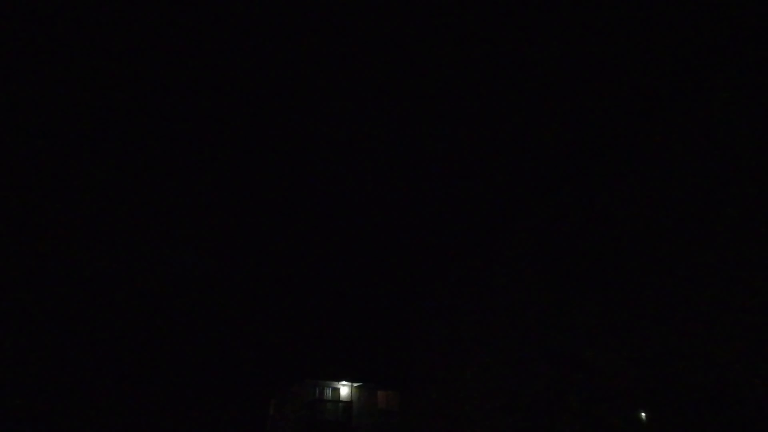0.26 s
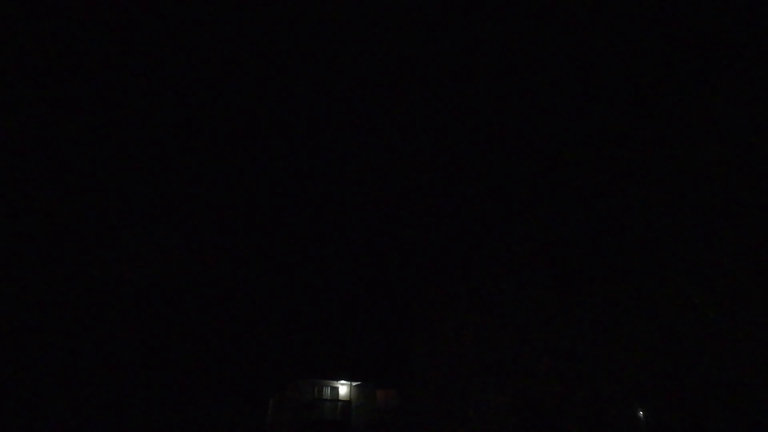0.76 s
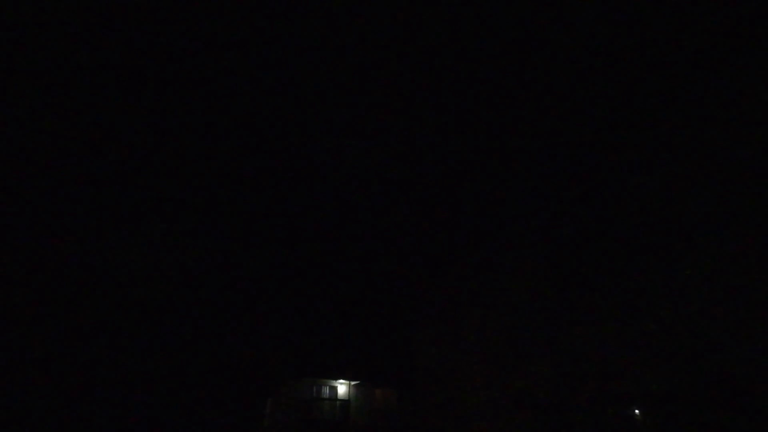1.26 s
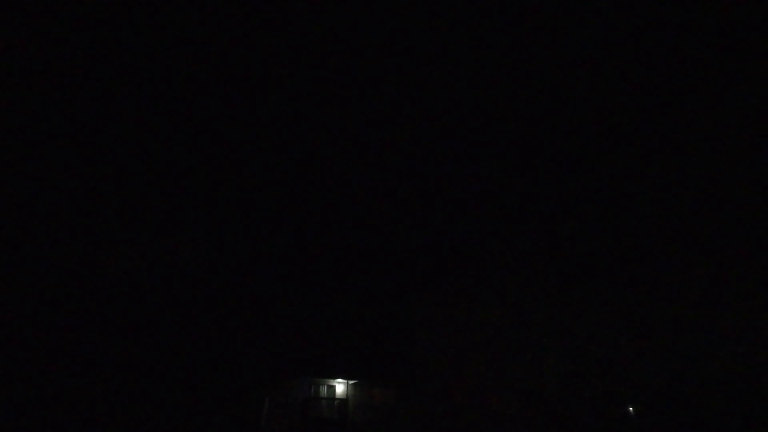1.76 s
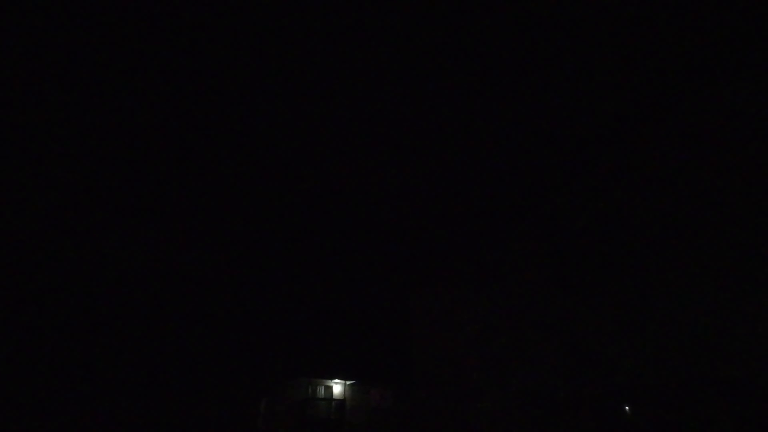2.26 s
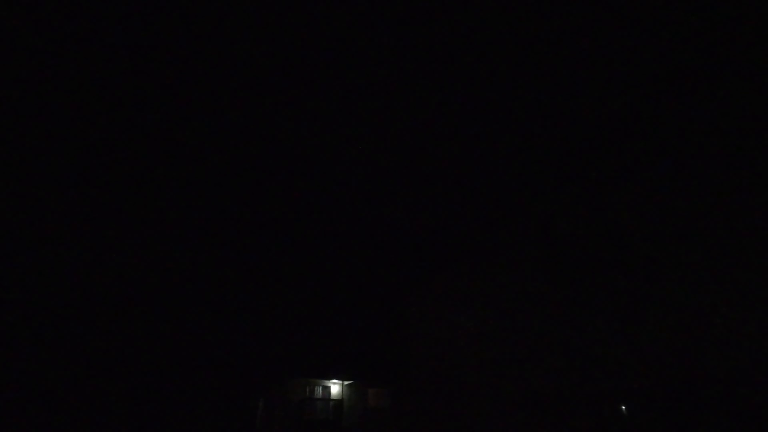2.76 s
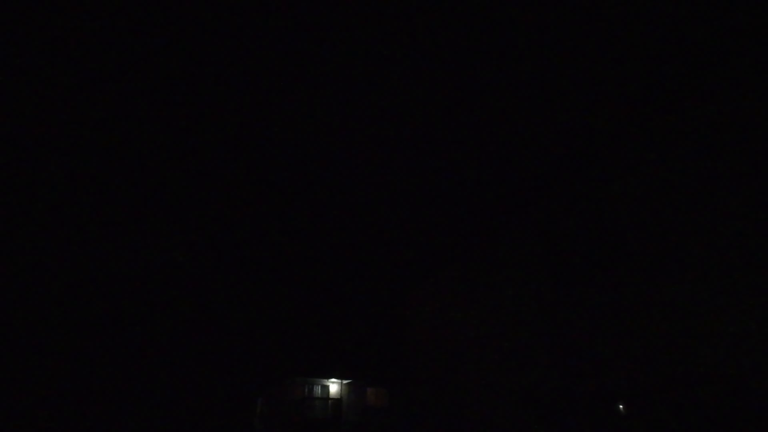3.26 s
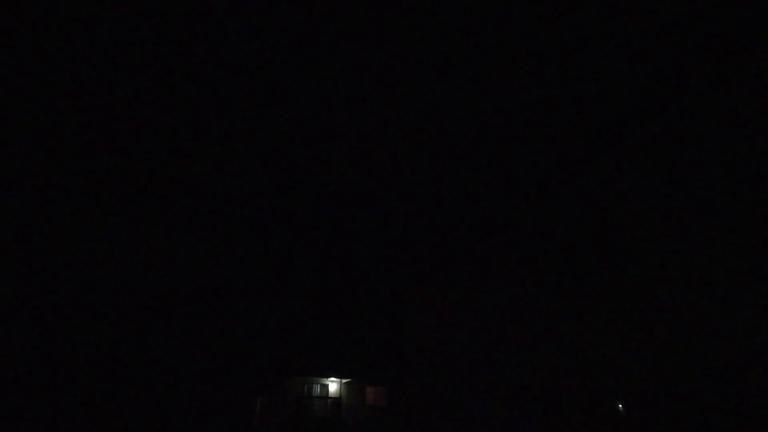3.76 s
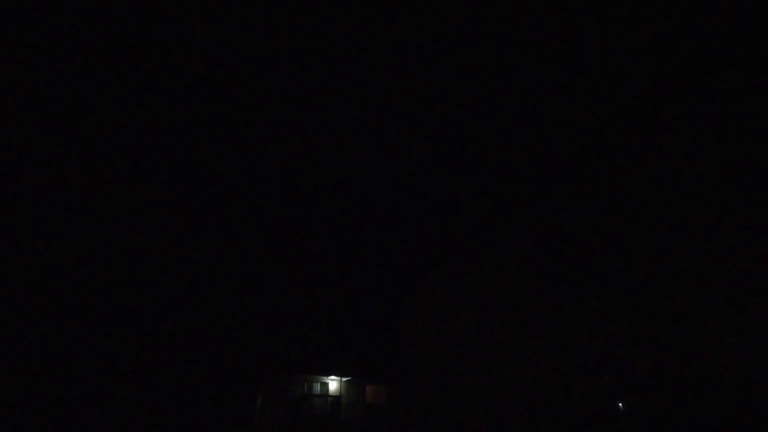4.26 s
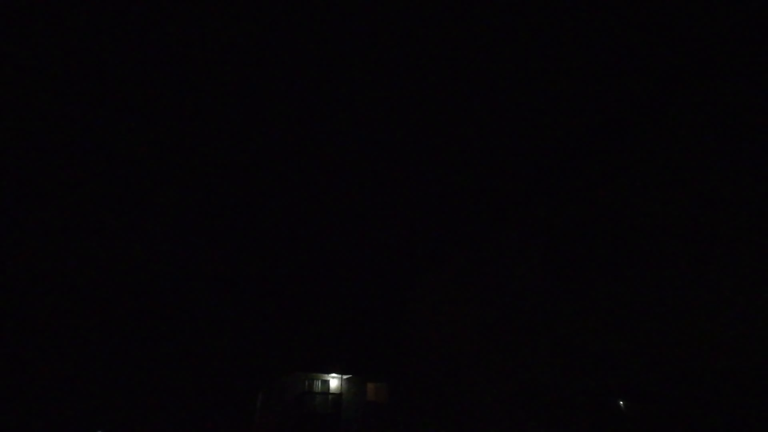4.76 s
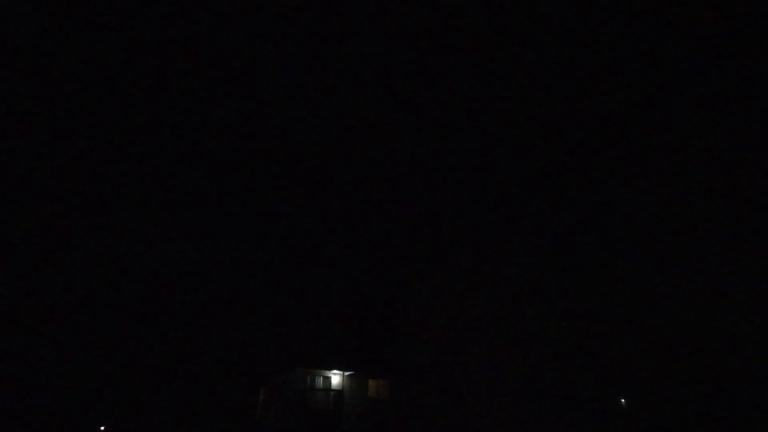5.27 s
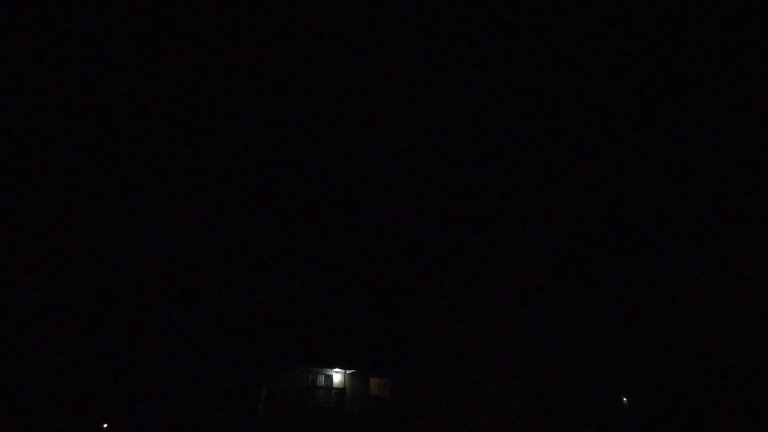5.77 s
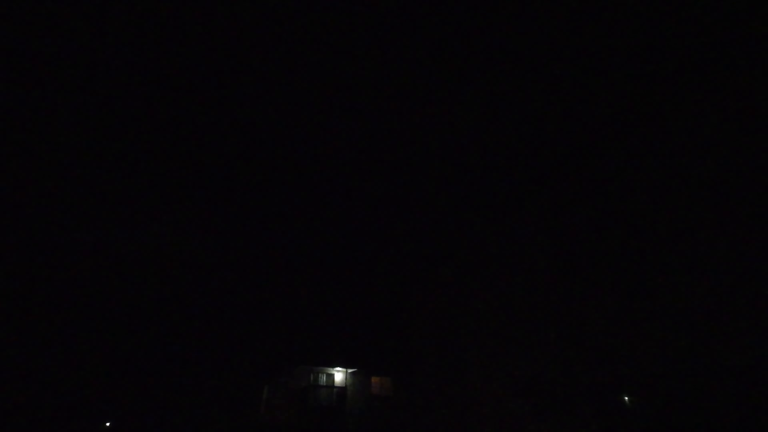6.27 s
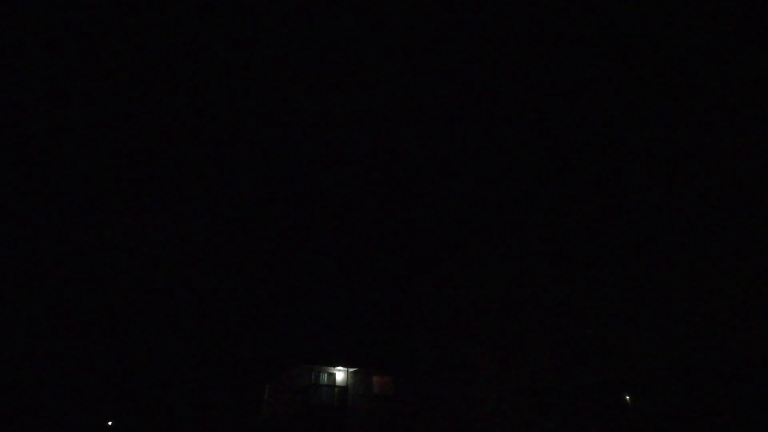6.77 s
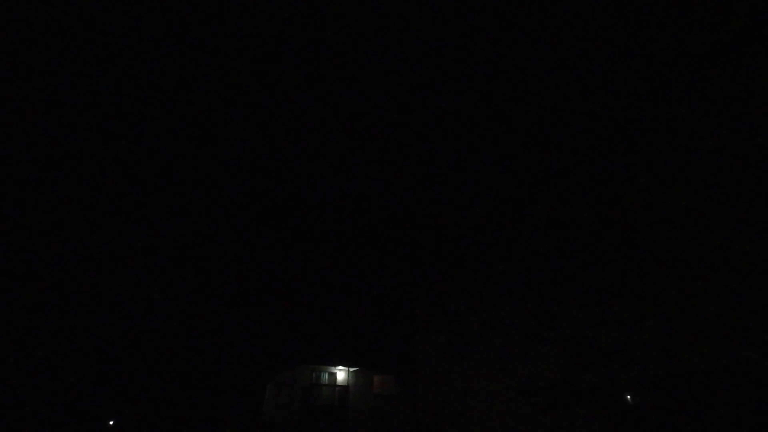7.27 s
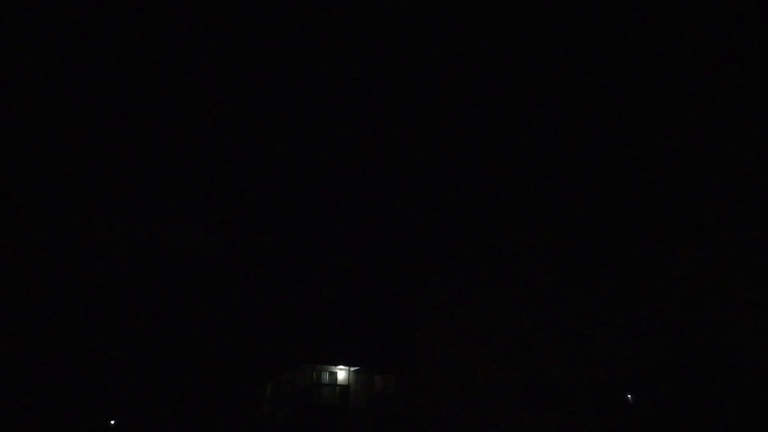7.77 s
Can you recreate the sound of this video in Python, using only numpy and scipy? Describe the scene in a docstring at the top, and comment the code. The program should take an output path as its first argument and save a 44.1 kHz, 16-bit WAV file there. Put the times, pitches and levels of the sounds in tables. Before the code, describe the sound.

A night yard heard from an open-air microphone. From 0 s a far rocket launch is already rumbling: very deep, grainy bass, mostly below 100 Hz, with a thicker roar at the start that thins out within the first two seconds. It swells and sags irregularly, with short surges around 1.4, 2.3, 5.1 and 6.2 s and brief lulls near 0.8, 3.8 and 7.2 s, fading gradually toward 8 s. Around 4 to 5.5 s a low narrow drone rises from it, sinks, and returns slightly higher and weaker. Throughout, a nearby fan motor, probably an air conditioner, gives a soft rush, mains-like hum and a fine, high panel buzz, its hum growing slowly. From 1.2 s a faint, high cricket chirps about three times a second to the end. One tiny dry tick comes at 2.4 s. Thin, steady hiss lies over everything.

```python
"""A far rocket launch rumbles first over a quiet yard at night: bands of noise surge and slowly fade.
Nearby a motor, likely an air conditioner, hums on multiples of its turning rate and buzzes by
exciting the modes of a loose panel, in the broadband rush of its fan.
A cricket joins with tonal chirps about three times a second, and a damped resonance ticks once."""
import sys
import numpy as np
from scipy import signal
from scipy.fft import rfft, irfft, next_fast_len
from scipy.io import wavfile
from scipy.ndimage import uniform_filter1d

SR = 44100
rng = np.random.default_rng(int(sys.argv[2]) if len(sys.argv) > 2 else 0)


def wav_record(signal):
    """Record a signal, one row per channel, as 16-bit PCM in the file named by sys.argv[1]."""
    frames = np.transpose(np.atleast_2d(signal))
    bounded = np.clip(frames, -1, 1)
    # unit amplitude maps onto the largest positive 16-bit level
    quanta = np.round(bounded * 32767).astype(np.int16)
    wavfile.write(sys.argv[1], SR, quanta)


N = 353566
TIME = np.arange(N) / SR


def from_db(db):
    """Level to amplitude: 20 dB is a factor of ten."""
    return 10 ** (np.asarray(db) / 20)


def rms_one(x):
    """Normalization: scale to a root mean square of 1."""
    return x / np.sqrt(np.mean(x ** 2) + 1e-20)


def in_time(rows):
    """Linear interpolation: the columns of a curve at every sample."""
    s, *columns = np.transpose(rows)
    return [np.interp(TIME, s, c) for c in columns]


def at_hz(points, hz):
    """Linear interpolation on a log-frequency axis."""
    known_hz, values = np.transpose(points)
    return np.interp(np.log(hz), np.log(known_hz), values)


def pan(left_db):
    """Interaural level difference: left and right gains, left_db being left minus right."""
    return from_db(np.array([[.5], [-.5]]) * left_db)


def drift(rate):
    """Low-passed noise: random fluctuation of spread 1, slower than about rate [Hz]."""
    step = 40  # samples between computed points
    r = np.exp(-2 * np.pi * step * rate / SR)
    noise = rng.standard_normal(N // step + 2002)
    slow = signal.lfilter([1], [1, -2 * r, r * r], noise)[2000:]  # drop the settling
    return np.interp(np.arange(N) / step, np.arange(len(slow)), rms_one(slow))


def ring(clicks, hz, t60):
    """Damped resonator: a unit click starts a sine of height 1 that falls 60 dB in t60 [s]."""
    r, w = from_db(-60 / (t60 * SR)), 2 * np.pi * hz / SR
    return signal.lfilter([0, np.sin(w)], [1, -2 * r * np.cos(w), r * r], clicks + 1e-18)


def tone(hz, wander_hz, rate):
    """Frequency modulation: a sine of rms 1 whose pitch wanders at random."""
    cycles = np.cumsum(hz + wander_hz * drift(rate)) / SR
    return np.sqrt(2) * np.sin(2 * np.pi * (cycles + rng.random()))


def partials(turns, table):
    """Harmonic series: gently wavering sines on multiples of a turning rate."""
    total = 0
    for multiple, db in table:
        sine = np.sin(2 * np.pi * (round(multiple) * turns + rng.random()))
        total = total + from_db(db + 2.0 * drift(11.0)) * sine
    return np.sqrt(2) * total


# stereo width of the noises: (frequency [Hz], side minus mid [dB])
WIDTH = [(25, -27), (70, -26), (160, -29), (195, -28), (240, -28), (470, -20), (830, -32), (1250, -18.5),
         (2000, -21.5), (4000, -12), (7000, -7), (11000, -7.5)]
# stereo balance of the noises: (frequency [Hz], left minus right [dB])
BALANCE = [(25, -6), (50, -1), (90, -0.3), (170, 1), (800, 0.07), (2800, 0.5), (5500, 1.5), (9000, -1.3)]


def turbulence(spectrum):
    """Spectral shaping: coloured stereo noise, nearly alike on both sides in the bass; rms 1."""
    size = next_fast_len(N)
    hz = np.maximum(np.arange(size // 2 + 1) * SR / size, 1)
    mid, side = rfft(rng.standard_normal((2, size)))
    pair = mid + from_db(at_hz(WIDTH, hz)) * side * [[1], [-1]]
    # beyond the table's ends the noise falls off at 12 dB per octave
    skirts = np.minimum(hz / spectrum[0][0], 1) ** 2 * np.minimum(spectrum[-1][0] / hz, 1) ** 2
    colour = skirts * from_db(at_hz(spectrum, hz))
    return rms_one(irfft(pair * colour * pan(at_hz(BALANCE, hz)), size)[:, :N])


# colour of the night air: (frequency [Hz], relative spectral density [dB])
HISS = [(1100, -12.5), (1700, -0.5), (2400, 2), (3000, -3), (3700, -1.5), (4500, -10), (5000, -5),
        (5800, -10.5), (6600, -13.5), (7700, -14), (8800, -20), (10000, -14.5), (11500, -19.5),
        (12400, -37), (15000, -35)]


def night_air():
    """Broadband noise: a thin, steady hiss."""
    return from_db(-54) * turbulence(HISS)


# colour of the fan's rush: (frequency [Hz], relative spectral density [dB])
RUSH = [(90, 4), (135, 6), (170, 2), (200, 3.5), (270, -0.5), (400, -1), (480, -5), (555, -0.5), (650, -6),
        (770, -3.5), (890, -0.5), (1030, -6.5), (1700, -15), (2600, -43)]
# mains and fan tones: (frequency [Hz], level [dB])
TONES = [(163, -58.5), (218, -58), (240, -53), (253, -66.5), (296, -71.5), (327, -64), (382, -65),
         (414, -63.5)]


def fan():
    """Flow noise and tones: a steady rush of air with soft mains and blade tones in it."""
    rush = from_db(-45 + 0.5 * drift(27.0)) * turbulence(RUSH)
    tones = sum(from_db(db + 1.0 * drift(1.0)) * tone(hz, wander_hz=0.32, rate=2.38) for hz, db in TONES)
    return rush + tones


MOTOR_HZ = 58.57  # mean turning rate
# motor hum: (multiple of the turning rate, level before the motor curve [dB])
HUM = [(18, -66), (19, -67.5), (20, -71.5)]
# air rushing through the housing, near the hum: (frequency [Hz], relative spectral density [dB])
HOUSING = [(900, 8), (1040, 15), (1140, 9), (1230, -2), (1380, -19)]
# motor whine: (multiple of the turning rate, level before the motor curve [dB])
WHINE = [(46, -71), (57, -76), (61, -73.5), (66, -75)]
# motor curve, in which the hum grows steadily: (time [s], hum gain [dB], whine gain [dB])
MOTOR = [(0, -6, -4), (1.8, -2, 0.5), (3, 0.5, -2), (4.5, 2.5, -0.5), (8, 4, -0.5)]
# a loose panel touches several times a turn: (share of the turn, relative level [dB])
CONTACTS = [(.40, 0), (.46, -3), (.63, 0), (.79, -4)]
# panel modes: (frequency [Hz], relative level at mid-time [dB], t60 [s], growth [dB per s])
PANEL = [(2610, -12, 0.013, 1.1), (3420, -1, 0.015, -0.1), (3890, 2, 0.0069, 0.02),
         (4140, 3.5, 0.0064, 0.7), (4333, -1.5, 0.0097, 1.0), (5040, -11, 0.0058, 0.8),
         (5810, -10, 0.0071, 0.5), (8040, -13, 0.0057, .4)]


def motor():
    """Periodic excitation: rotation sounds harmonics and strikes a panel's modes on every turn."""
    turns = np.cumsum(MOTOR_HZ * (1 + .0002 * drift(0.96))) / SR
    hum_db, whine_db = in_time(MOTOR)
    housing_air = from_db(-68.5) * turbulence(HOUSING)
    hum = from_db(hum_db) * (partials(turns, HUM) + housing_air)
    whine = from_db(whine_db) * partials(turns, WHINE)

    touches = np.zeros(N)
    for share, db in CONTACTS:
        once_a_turn = np.diff(np.floor(turns - share), prepend=-1)
        touches += from_db(db + drift(25)) * once_a_turn
    buzz = np.zeros(N)
    for k, (hz, db, t60, growth) in enumerate(PANEL):
        mode_gain = from_db(db + growth * (TIME - TIME.mean()))
        buzz += (-1) ** k * mode_gain * ring(touches, hz, t60)  # neighbouring modes alternate in sign
    return hum + (whine + from_db(-60) * rms_one(buzz)) * pan(left_db=2.5)


def yard(x):
    """Diffuse scattering: walls and shrubs add a short tail, different on each side."""
    t60_s = .45
    age = TIME[:SR // 2]
    tail = rng.standard_normal((2, len(age))) * from_db(-60 * age / t60_s)
    tail /= np.sqrt(np.sum(tail ** 2) / 2)
    return signal.fftconvolve(x[None], tail, axes=1)[:, :N]


CRICKET_HZ, STROKE_SPACING_S = 7200, 0.046
# cricket chirps: (start time [s], level before the stroke trim [dB])
CHIRPS = [(1.24, -64), (1.50, -64), (1.86, -65), (2.16, -68), (2.47, -65.5), (2.78, -67), (3.08, -67.5),
          (3.47, -67.5), (3.80, -63.5), (4.12, -64.5), (4.43, -65), (4.76, -67), (5.11, -65), (5.44, -65),
          (5.76, -65), (6.16, -66), (6.49, -64), (6.85, -62.5), (7.18, -65), (7.50, -65), (7.88, -64.5)]


def cricket():
    """Stridulation: two uneven wing strokes a chirp, blurred by the yard; others sound faintly far off."""
    strokes = np.zeros(N)
    chances = rng.uniform(-1, 1, (len(CHIRPS), 2, 2))
    for (start, db), chance in zip(CHIRPS, chances):
        for k, (force, stretch) in enumerate(chance):
            length = int(STROKE_SPACING_S * SR * 0.99 * 0.75 ** stretch)
            stroke = from_db(db - 2.5 + 1.1 * force) * np.hanning(length) ** 0.5
            at = int((start + k * STROKE_SPACING_S) * SR)
            strokes[at:at + length] += stroke[:max(N - at, 0)]
    near = strokes * from_db(2.0 * drift(90)) * tone(CRICKET_HZ, wander_hz=22, rate=43)
    far = from_db(-88 + 3.5 * drift(5)) * tone(6870, wander_hz=33.7, rate=66)
    return (near + from_db(-5) * yard(near) + far) * pan(left_db=-4.0)


# hard contacts, so close that they make one dry tick: (time [s], click level before filtering [dB])
TICKS = [(2.4391, -36), (2.4415, -49), (2.452, -44)]


def tick():
    """Impulse response: a tiny hard contact rings very briefly, high up."""
    clicks = np.zeros(N)
    for s, db in TICKS:
        clicks[int(s * SR)] = from_db(db)
    rung = ring(clicks, hz=10200, t60=.0008)
    low_pass = signal.butter(6, 11800, fs=SR, output="sos")
    return signal.sosfilt(low_pass, rung) * pan(left_db=-1.0)


# a narrow drone inside the roar: (time [s], pitch [Hz], level [dB])
DRONE = [(3.8, 112, -50), (3.95, 113.7, -39), (4.07, 115.3, -34), (4.3, 116.8, -37.5), (4.45, 116.5, -42),
         (4.65, 116, -37.5), (4.8, 113.5, -41), (4.9, 111, -50), (5.12, 119.5, -41), (5.4, 120.5, -43),
         (5.6, 122, -54)]


def drone():
    """Narrow-band tone: a low note rises out of the roar, sinks and returns higher and weaker."""
    hz, db = in_time(DRONE)
    sounding = (TIME > DRONE[0][0]) & (TIME < DRONE[-1][0])
    fade = uniform_filter1d(sounding * 1.0, SR // 10)
    return fade * from_db(db + 2.0 * drift(6.6)) * tone(hz, wander_hz=1.0, rate=6.5)


def evened(x):
    """Gain levelling: keep the quick flutter of a noise, level its slower swells."""
    span = int(.06 * SR)
    return x / np.sqrt(uniform_filter1d(np.mean(x ** 2, axis=0), span) + 1e-9)


def bumps(rows):
    """Gaussian envelope: a smooth rise or dip in dB around each event."""
    return sum(db * np.exp(-((TIME - s) / half_width_s) ** 2) for s, db, half_width_s in rows)


# slow swell and fade: (time [s], deep rumble, upper roar and growl levels, the first two untrimmed [dB])
ROCKET = [(0.0, -31, -15.5, -28.5), (0.4, -25, -20, -37), (0.8, -27, -20, -40.5), (1.2, -25, -24, -42),
          (1.45, -22, -25.5, -34.5), (1.95, -24, -27.5, -38.5), (2.3, -28, -26, -38),
          (2.65, -25.5, -21.5, -35), (3.0, -21, -27, -38), (3.5, -26.5, -23, -32.5),
          (3.9, -28, -24.5, -41.5), (4.6, -27.5, -29.5, -42), (4.85, -24.5, -23.5, -45),
          (5.15, -30.5, -26.5, -39.5), (5.62, -33, -27.5, -35.5), (5.9, -29, -28, -40.5),
          (6.4, -34, -28.5, -40.5), (7.05, -30, -27, -40.5), (7.6, -31, -25.5, -38.5),
          (8.02, -30, -33, -35.5)]
# colours of deep rumble, upper roar and higher growl: (frequency [Hz], relative spectral density [dB])
DEEP = [(11, -2.5), (14, -4.5), (17.5, 4.5), (22, -3), (30, 4.5), (38, 5), (49, -3.5), (62, -18), (95, -30)]
ROAR = [(42, -2), (52, 9), (60, 4), (71, -0.5), (90, -22), (140, -29), (400, -66)]
GROWL = [(65, -7), (82, 5.5), (100, 1.5), (118, -1), (132, -10), (190, -23.5)]
# brief surges, slight to strong: (time [s], rise above the swell [dB], half-width [s])
SURGES = [(0.13, 1.5, 0.014), (0.41, 4, .03), (1.22, 5.5, .04), (1.44, 6, 0.016), (1.66, 2.5, 0.051),
          (2.31, 7.5, 0.027), (2.92, 4, .035), (3.21, 4, 0.051), (3.49, 4, 0.024), (4.02, 1, .02),
          (4.64, 5, .02), (4.90, 2.5, .025), (5.10, 12.5, 0.014), (6.24, 10.5, 0.01), (7.39, 5.5, 0.021),
          (7.55, 8, 0.0078), (7.72, 7.5, 0.02)]
# brief lulls, slight to strong, and one slight rise: (time [s], change from the swell [dB], half-width [s])
LULLS = [(0.67, -7, 0.035), (0.84, -15, 0.017), (1.29, -5.5, 0.044), (1.72, -3, .014), (1.85, 2, .02),
         (2.18, -9, 0.07), (2.55, -8, 0.023), (2.83, -2.5, 0.077), (3.10, -8, 0.011), (3.33, -9, 0.02),
         (3.76, -13, 0.026), (4.95, -2, 0.015), (5.81, -8, 0.017), (5.90, -7.5, .035), (6.14, -3, 0.076),
         (6.98, -9, 0.021), (7.23, -12, 0.023), (7.94, -5.5, 0.032)]
DEEP_TRIM_DB, ROAR_TRIM_DB = -1.0, -3.4
# moving air makes rumble and roar flutter at random
FLUTTER_RATE_HZ, DEEP_FLUTTER_DB, ROAR_FLUTTER_DB = 4.7, 1.33, 1


def rocket():
    """Propagation loss: miles of air leave only the jet's bass, and make it surge and sag."""
    deep_db, roar_db, growl_db = in_time(ROCKET)
    deep_db = deep_db + DEEP_TRIM_DB + DEEP_FLUTTER_DB * drift(FLUTTER_RATE_HZ)
    roar_db = roar_db + ROAR_TRIM_DB + ROAR_FLUTTER_DB * drift(FLUTTER_RATE_HZ)
    deep = from_db(deep_db) * evened(turbulence(DEEP))
    roar = from_db(roar_db) * evened(turbulence(ROAR))
    growl = from_db(growl_db) * turbulence(GROWL)
    surging = from_db(bumps(SURGES) + bumps(LULLS))
    return surging * (deep + roar) + growl


def scene():
    """Superposition: the near sounds of the yard and the far rumble add."""
    return night_air() + fan() + motor() + cricket() + tick() + drone() + rocket()


def record(dry):
    """Band limiting: a steep elliptic low-pass cuts the top."""
    low_pass = signal.ellip(10, .1, 80, 15700, fs=SR, output="sos")  # ripple, stop band [dB]; edge [Hz]
    return signal.sosfilt(low_pass, dry)


dry = scene()
out = record(dry)
wav_record(out)
```